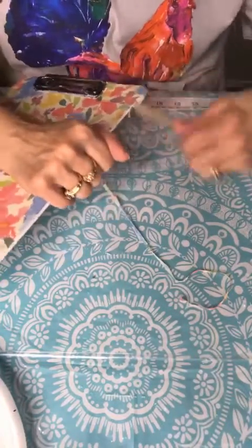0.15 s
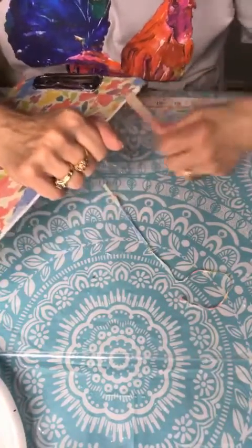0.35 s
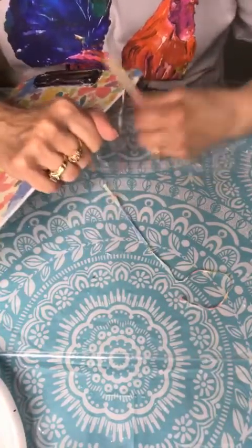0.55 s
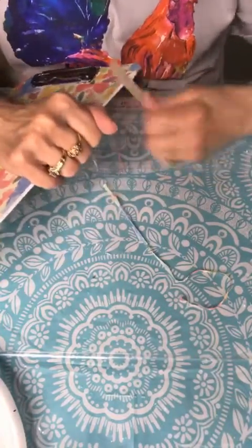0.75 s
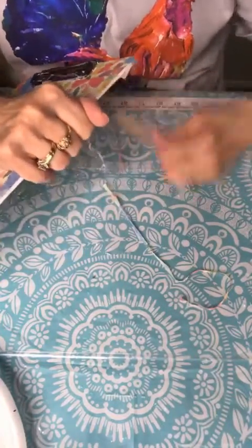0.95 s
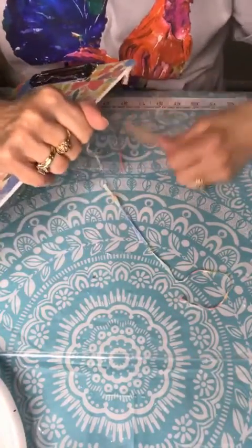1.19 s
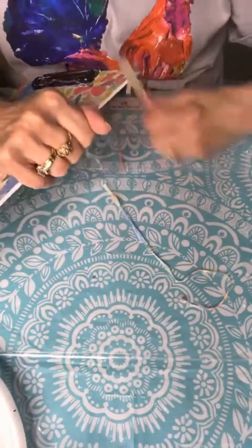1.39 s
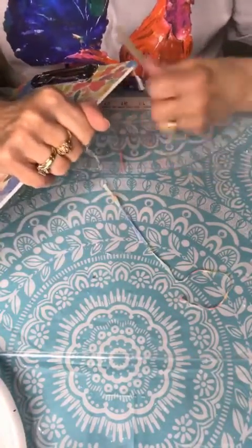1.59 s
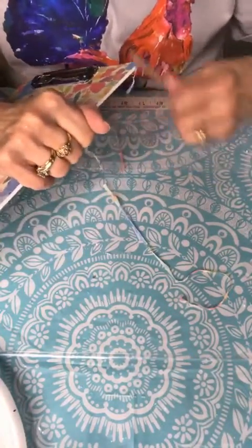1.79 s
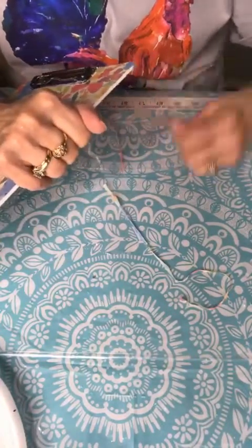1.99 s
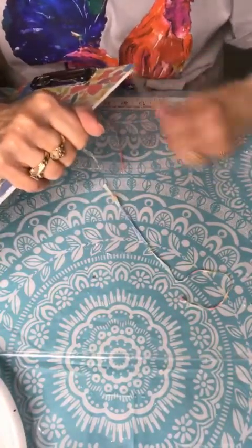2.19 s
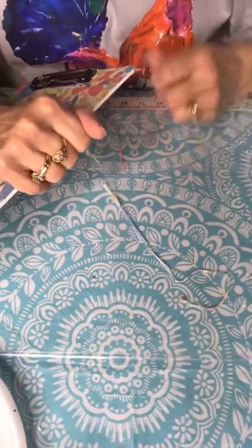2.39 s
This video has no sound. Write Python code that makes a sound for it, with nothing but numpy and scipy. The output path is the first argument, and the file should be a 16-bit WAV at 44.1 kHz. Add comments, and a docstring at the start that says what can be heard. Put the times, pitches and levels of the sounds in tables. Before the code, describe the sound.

An emery board rasps across a paper-covered clipboard edge nine times, close up, at nearly four strokes a second from about 0.1 to 2.3 seconds. Each stroke lands with a light knock, swells into a gritty hiss and fades quickly, with tiny snags between some strokes. The board rings slightly and gives soft low thumps, strongest near 0.7, 1.5 and 1.7 seconds. Quiet small-room tone lies underneath.

```python
"""A small furnished room: an emery board is drawn nine times across the edge of a paper-covered
clipboard, close to one microphone. The grit catches the paper in dense grains that hiss and shake the
board's low and middle modes. Each stroke lands with a knock, and the file snags on its way back.
The board bends with a low rumble, loudest as the file slips off. Quiet room tone lies underneath."""
import sys
import numpy as np
from scipy import signal
from scipy.fft import rfft, irfft
from scipy.io import wavfile

SR = 44100
rng = np.random.default_rng(int(sys.argv[2]) if len(sys.argv) > 2 else 0)


def put_to_file(sound):
    """Save the sound as 16-bit audio at rate SR, in the file named by the first command-line argument."""
    columns = np.atleast_2d(sound).T  # one column per channel
    safe = np.clip(columns, -1, 1)
    whole_steps = np.round(safe * 32767)
    wavfile.write(sys.argv[1], SR, whole_steps.astype(np.int16))


N = 107780

# The file lands on the edge with a knock; the spot sets which modes lead:
# (time [s], level [dB], tilt of low modes [dB/octave], tilt of middle modes [dB/octave])
LANDINGS = [(0.0619, -39, -3, -3), (0.3387, -39, -3, -3), (0.6051, -34, -8, 1.5), (0.868, -44, -8, 1.5),
            (1.131, -42, 3, 3), (1.4038, -38, 3, 1.5), (1.6612, -47, -5, 3), (1.9311, -35, 5, 5),
            (2.194, -34, 3, 3)]


def grit_hiss(hiss_gain, top_gain, split_hz=8000):
    """Grit scrapes paper: a grainy hiss with flickering humps, in two bands with a gain each."""
    # Tone of the hiss: (frequency [Hz], relative level [dB])
    spectrum = [(150, -11), (400, -16), (600, -12), (1000, -11), (1400, -16), (2400, -10), (3000, -9),
                (4700, -12), (6900, -11.5), (10500, -14.5), (14100, -14), (15000, -19)]
    # Broad humps in the hiss: (frequency [Hz], boost [dB], width [Hz])
    humps = [(2956, 6, 220), (3540, 3.5, 160), (3967, 8, 344), (6120, 5.5, 330), (6820, 4.5, 310),
             (9540, 4, 330)]
    grit = coloured(grains(), spectrum)
    grit = grit + sum((from_db(db) - 1) * resonance(grit * from_db(drift(3.5, rate_hz=11.7)), hz, width)
                      for hz, db, width in humps)
    body = rms_one(butterworth(grit, 4, split_hz, "low"))
    top = rms_one(butterworth(grit, 4, split_hz, "high"))
    return hiss_gain * body + top_gain * top


def grains(per_s=30000, spread_db=3):
    """Dense uneven clicks of grit catching paper, coming in clumps; rms 1."""
    size_db = spread_db * np.minimum(rng.exponential(1, N), 5)
    clump_db = drift(1.89, rate_hz=138)
    clicks = from_db(size_db + clump_db) * rng.choice([-1, 1], N)
    return rms_one(clicks * (rng.random(N) < per_s / SR))


def stroke_envelopes(land_s=0.0014, lift_s=0.014):
    """Gains of five layers: in each stroke the file lands suddenly, rides its curve and lifts quickly."""
    # One curve per stroke: (time [s], hiss level [dB], low ring [dB re hiss], middle ring [dB re hiss],
    # top hiss [dB re hiss], bending rumble [dB re hiss])
    strokes = [
        [(0.062, -33.5, -6, 4, -9, -20), (0.076, -33, -8, -2, 0, -17), (0.092, -34, -3, 2, -4, -11),
         (0.12, -32.5, -11, 3, -7, -21), (0.128, -32.5, -9, 6.5, -5, -11), (0.158, -42.5, -14, -4.5, -5, 0),
         (0.19, -57.5, 4, 6, -2, 17), (0.2, -46.5, -26, -1.5, 0, -1), (0.226, -45, -21, -22, -2, -9),
         (0.245, -60.5, -16, -3, 0, 5.5)],
        [(0.339, -34, -1, 5, -7, -20), (0.357, -39, 11.5, 2.5, 0, -3), (0.363, -30.5, -3, -6.5, -4, -10),
         (0.379, -36.5, -5.5, 3.5, -5, -2), (0.393, -28.5, -14, 0, -8.5, -18), (0.415, -44, 2, -4, 1.5, -9),
         (0.427, -40, -3.5, -8.5, 1, -19), (0.455, -60, 3, -1, -8, -4), (0.475, -45.5, -24, -15, -3, -20),
         (0.49, -69, -10, -3, -10, -6)],
        [(0.605, -32, 1.5, 0.5, -8, -26), (0.625, -32, -3, -8, 2.5, -11), (0.641, -40, -7, 1, 0, -7),
         (0.653, -30, -11.5, -2.5, -5.5, -16), (0.677, -37, -1.5, -1.5, -3, 5),
         (0.701, -41.5, -9, -10.5, 4, -1), (0.745, -59, -12, 2, -4, 5), (0.755, -49.5, -23, -6, 2.5, -4),
         (0.79, -61.5, -14, -5, -2, -6)],
        [(0.868, -42, 3.5, 6.5, -21, -22), (0.878, -50, 10, 6, -2, -14), (0.898, -34, -8.5, -4.5, -5.5, -23),
         (0.918, -29, -17, -6.5, -1, -12), (0.954, -44.5, -9.5, -8.5, -2.5, -8), (0.99, -55, -25, -7, -4, -13)],
        [(1.131, -37.5, 5.5, 4.5, -14, -9), (1.149, -34.5, 5.5, 0, -4, -11), (1.157, -35, -5.5, 6, -4.5, -8),
         (1.183, -28, -17, -9, 1, -19), (1.201, -43, -2.5, -2, 2.5, -3), (1.24, -54, -10, -18, -2, -9)],
        [(1.404, -34.5, 6, 7.5, -1, -20), (1.422, -35.5, 12, 1, -14, -12), (1.456, -26.5, -18, -7.5, -1, -15),
         (1.476, -40, -7, -3, -3, 7.5), (1.508, -44.5, -17, -16, 0.5, -2), (1.552, -46, -28, -12, -1, -6),
         (1.59, -57, -16, -13, -5, -14)],
        [(1.661, -36, 3, 5.5, -11, -19), (1.677, -38.5, -2, 1, 2, -6), (1.683, -35, -4, -5, -8, -18),
         (1.723, -29.5, -6, -3, -1, -3), (1.757, -46.5, -6, -11, -1, 3), (1.769, -41, -12, -15, 0, -4),
         (1.793, -52.5, -11, -8, 0, -0.5), (1.821, -44.5, -34, -23, -3, -25), (1.84, -59, -9, -4, 5.5, -3)],
        [(1.931, -30.5, 4, 2.5, -10, -22), (1.945, -33.5, 9, 2.5, -12, -14), (1.953, -32.5, -11, -9, -7, -14),
         (1.981, -32.5, -9.5, -8, -2, -7), (2.003, -47, -10, -10, -8, -1), (2.027, -39.5, -21, -24, 1, -9),
         (2.047, -59, -11, -15, -1, 1), (2.06, -51, -9, -9, -4, -7)],
        [(2.194, -32.5, 7.5, 4.5, -12, -27), (2.212, -33, 5, 3.5, -4, -4), (2.22, -29, -6.5, -9.5, -9.5, -9),
         (2.246, -33, -10, -11, -3, -9), (2.252, -39.5, -3, -12, -7, -6), (2.31, -58.5, -12, -6, -3, 0.5)],
    ]
    t, gains = np.arange(N) / SR, np.zeros((5, N))
    for curve in strokes:
        times, hiss_db, *offsets_db = np.transpose(curve)
        attack = np.clip((t - times[0]) / land_s + 1, 0, 1)
        release = np.clip((times[-1] - t) / lift_s + 1, 0, 1)
        gains += attack * release * from_db([np.interp(t, times, hiss_db + db) for db in [0, *offsets_db]])
    return gains


def snag_envelope():
    """The file snags briefly on its way back: sharp spikes of gain for the hiss."""
    # Snags: (time [s], level [dB])
    snags = [(0.1984, -39), (0.2116, -47), (0.4648, -45.5), (0.752, -42), (1.509, -35), (1.546, -41),
             (1.5682, -44), (1.7665, -39), (1.804, -38), (2.0208, -41.5), (2.411, -71), (2.4333, -66)]
    return bursts(snags, decay_s=0.002)


def board_ring(low_gain, mid_gain):
    """The clipboard rings under the grit, its modes tilted anew at each landing."""
    # Low body modes: (frequency [Hz], level [dB], width [Hz])
    low_modes = [(308.3, -3, 53.5), (414, 6.5, 36), (513, -11, 28), (664, -11, 90), (233, -14.5, 86)]
    # Middle body modes: (frequency [Hz], level [dB], width [Hz])
    mid_modes = [(936, -6, 70), (1162, -1.5, 113), (1351, 5.5, 87), (1675, 2, 103), (1865, -1, 107),
                 (2144, -4, 136)]
    times, _, low_tilt, mid_tilt = np.transpose(LANDINGS)
    stroke = np.maximum(np.searchsorted(times, np.arange(N) / SR) - 1, 0)
    low = shaken_modes(low_modes, low_gain, low_tilt[stroke])
    return low + shaken_modes(mid_modes, mid_gain, mid_tilt[stroke])


def shaken_modes(modes, gain=1, tilt_db_per_octave=0):
    """Grains under a gain shake a set of modes; the share of each wanders as the contact moves."""
    drive = grains()
    octaves = np.log2([hz for hz, _, _ in modes])
    shares = [from_db(drift(1.5, rate_hz=6) + tilt_db_per_octave * octave)
              for octave in octaves - octaves.mean()]

    def ring(x):
        return sum(from_db(db) * (-1) ** k * resonance(x * shares[k], hz, width)
                   for k, (hz, db, width) in enumerate(modes))
    return ring(drive * gain) / np.std(ring(drive))


def bending_rumble(gain, cutoff_hz=127):
    """The board flexes under the file and springs back with a thump as the file slips off."""
    # Bending modes: (frequency [Hz], level [dB], width [Hz])
    modes = [(47.6, -8, 18), (66, 0.5, 16), (98.6, -5, 34), (137, -1, 21)]
    # Each slip is one push that rings all bending modes: (time [s], push level [dB])
    slips = [(0.082, -40), (0.175, -38.5), (0.357, -42.5), (0.666, -32), (0.915, -45.5), (1.184, -39.5),
             (1.464, -34), (1.723, -31.5), (1.974, -35), (2.223, -39)]
    flex = gain * shaken_modes(modes)
    times, push_db = np.transpose(slips)
    pushes = np.zeros(N)
    pushes[(times * SR).astype(int)] = from_db(push_db)
    thumps = sum(from_db(db) * resonance(pushes * SR / (2 * np.pi * width), hz, width)
                 for hz, db, width in modes)
    return butterworth(flex + thumps, 2, cutoff_hz, "low")


def room_reverb(x, level_db=-15.5, t60_s=0.25, build_s=0.018, cutoff_hz=21700):
    """The room's short diffuse tail: decaying noise with the very top shaved off."""
    t = np.arange(SR // 2) / SR
    tail = rng.standard_normal(len(t)) * from_db(-60 * t / t60_s) * np.clip(t / build_s, 0, 1)
    tail = butterworth(tail, 1, cutoff_hz, "low")
    return from_db(level_db) * signal.fftconvolve(x, tail / np.sqrt(np.sum(tail ** 2)))[:N]


def room_tone(level_db=-64.5):
    """A steady bed of dark noise."""
    # Tone of the bed: (frequency [Hz], relative level [dB])
    spectrum = [(30, 5), (60, 9), (130, 2), (260, -0.5), (450, -9), (1000, -7.5), (1700, -13.5),
                (4800, -16), (9000, -20), (11000, -27), (16000, -48)]
    return from_db(level_db) * coloured(rng.standard_normal(N), spectrum)


def bursts(events, decay_s):
    """An envelope that jumps at each event and dies fast."""
    t = np.arange(N) / SR
    return sum(from_db(db) * (t >= start) * np.exp(-np.maximum(t - start, 0) / decay_s)
               for start, db, *_ in events)


def drift(spread_db, rate_hz):
    """A smooth random wobble of level, in dB."""
    r = np.exp(-2 * np.pi * rate_hz / SR)
    wobble = signal.lfilter([1], [1, -2 * r, r * r], rng.standard_normal(N + SR))
    return spread_db * rms_one(wobble[SR:])


def resonance(x, hz, width_hz):
    """Two-pole band-pass, gain 1 at its peak."""
    r = np.exp(-np.pi * width_hz / SR)
    poles = [1, -2 * r * np.cos(2 * np.pi * hz / SR), r * r]
    return signal.lfilter([(1 - r * r) / 2, 0, (r * r - 1) / 2], poles, x + 1e-18)


def coloured(x, spectrum):
    """Shape x with a smooth EQ curve; rms 1."""
    hz, db = np.transpose(spectrum)
    bins_hz = np.maximum(np.arange(N // 2 + 1) * SR / N, 1)
    eq = from_db(np.interp(np.log(bins_hz), np.log(hz), db))
    return rms_one(irfft(rfft(x) * eq, N))


def butterworth(x, order, hz, kind):
    """Low-pass or high-pass with a flat passband."""
    return signal.sosfilt(signal.butter(order, hz, kind, fs=SR, output="sos"), x)


def from_db(db):
    """dB to gain."""
    return 10 ** (np.asarray(db) / 20)


def rms_one(x):
    """Scale to rms 1."""
    return x / np.sqrt(np.mean(x ** 2) + 1e-20)


def scene():
    """Mono mix: hiss and ring with reverb, the rumble dry, room tone beneath."""
    hiss, low, mid, top, bend = stroke_envelopes()
    snag, knock = snag_envelope(), bursts(LANDINGS, decay_s=0.004)
    filing = grit_hiss(hiss + snag + knock, top + from_db(-6) * snag)
    filing += board_ring(low + from_db(-6) * knock, mid + from_db(-8) * knock)
    rumble, bed = bending_rumble(bend), room_tone()
    return (filing + room_reverb(filing) + rumble + bed)[None]


def record(dry, low_cut_hz=44, high_cut_hz=15750):
    """Bass roll-off and a steep top cut."""
    trimmed = butterworth(dry, 4, low_cut_hz, "high")
    return signal.sosfilt(signal.ellip(10, .5, 60, high_cut_hz, fs=SR, output="sos"), trimmed)


dry = scene()
out = record(dry)
put_to_file(out)
```